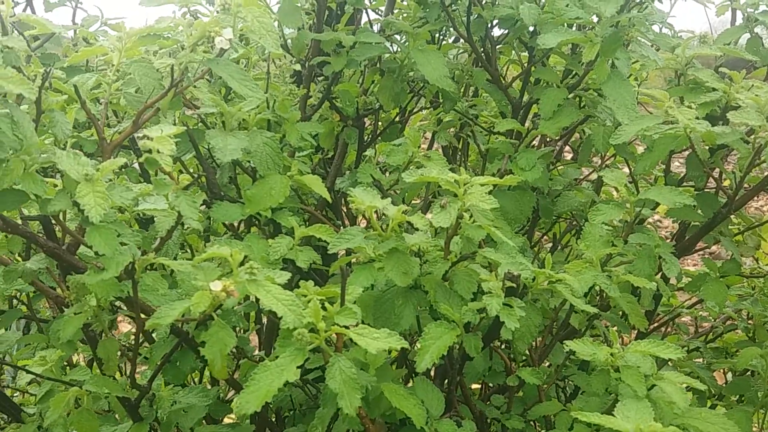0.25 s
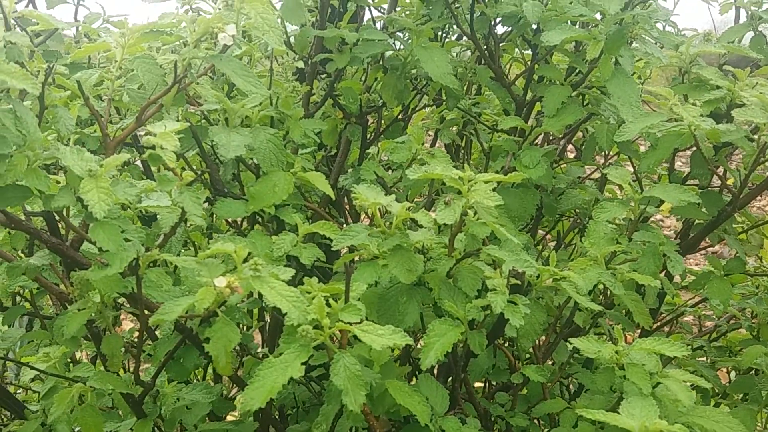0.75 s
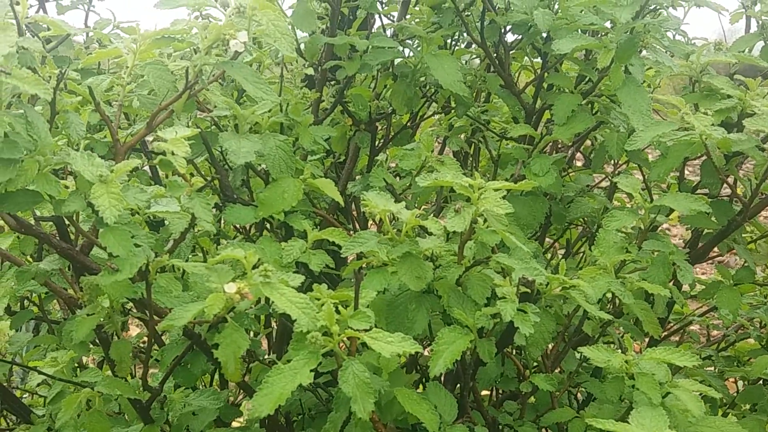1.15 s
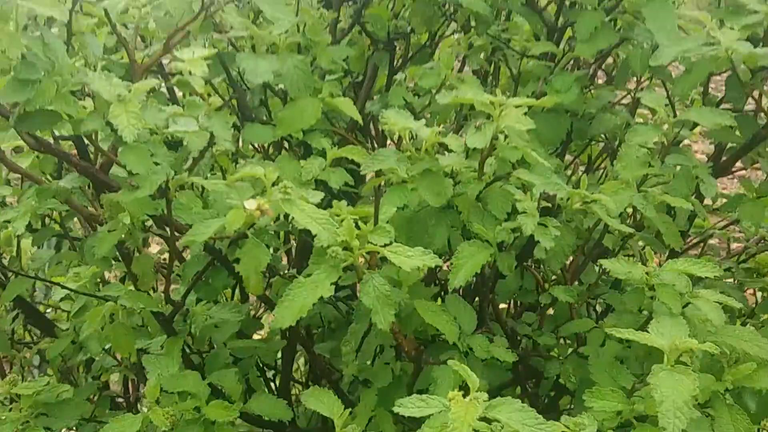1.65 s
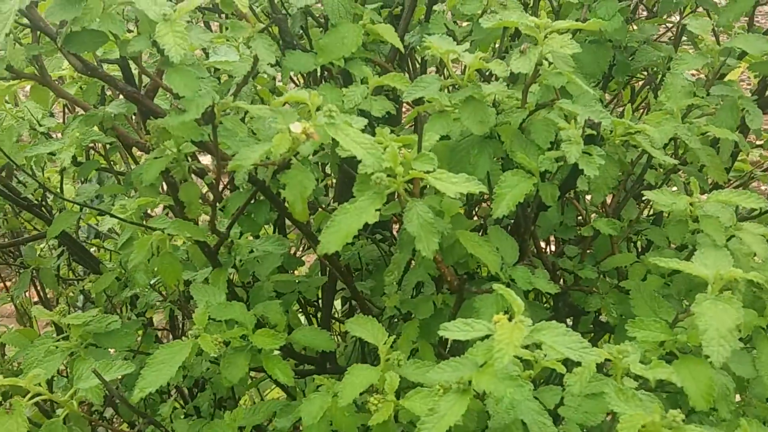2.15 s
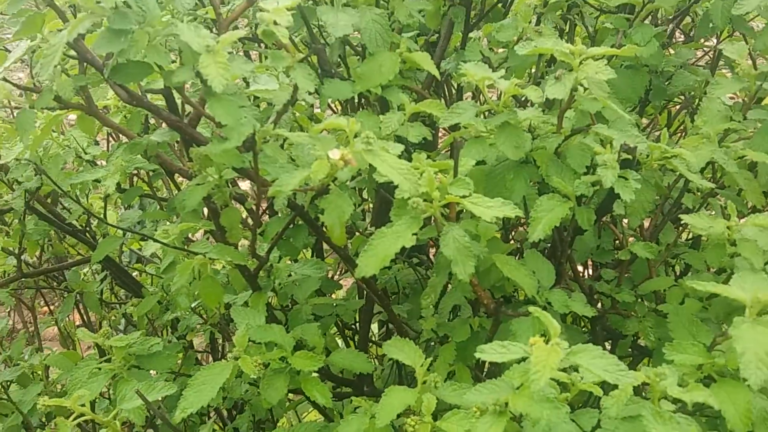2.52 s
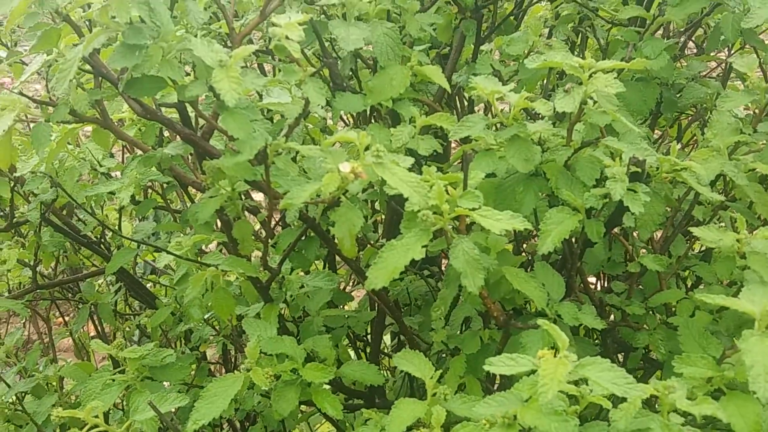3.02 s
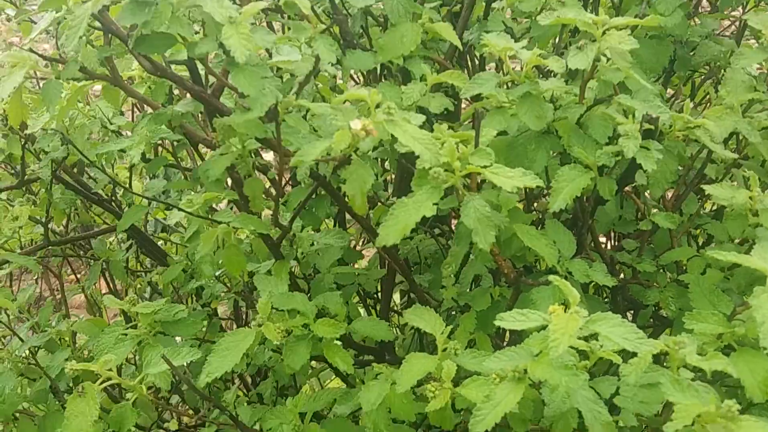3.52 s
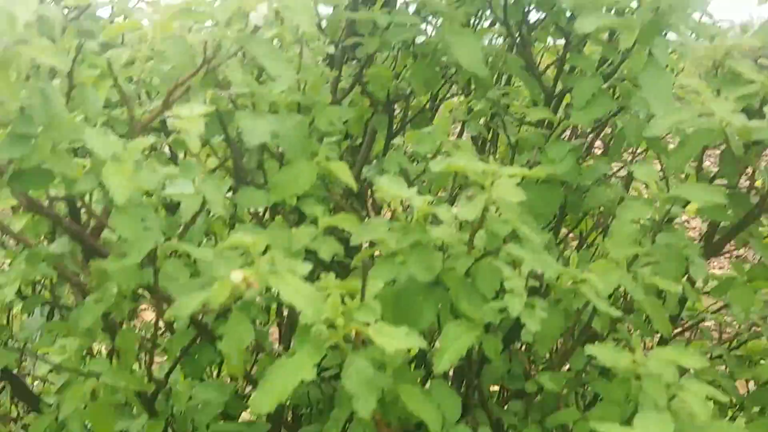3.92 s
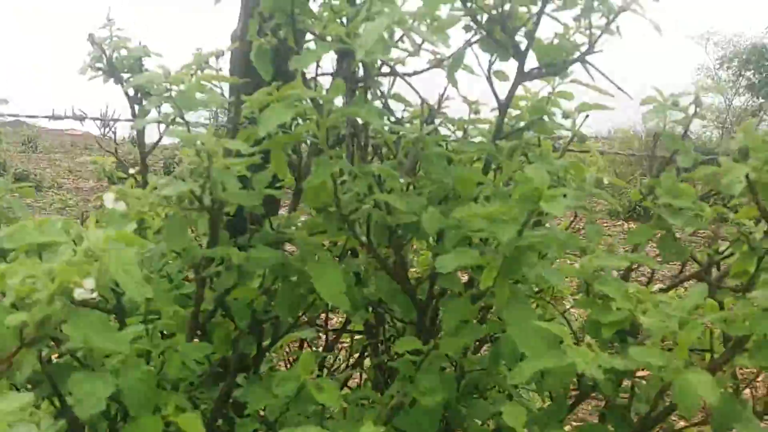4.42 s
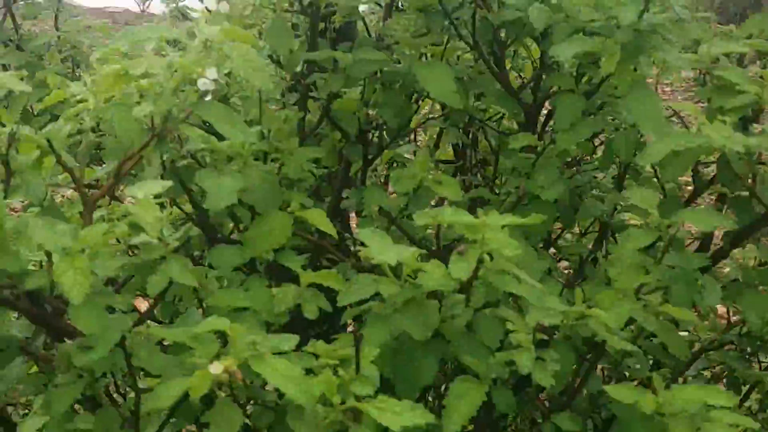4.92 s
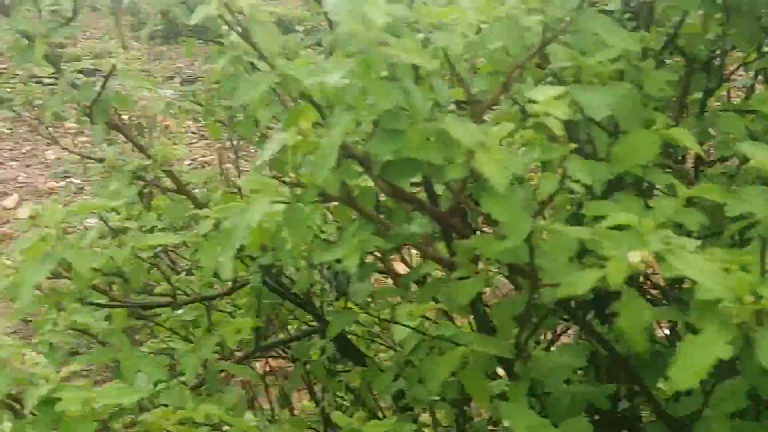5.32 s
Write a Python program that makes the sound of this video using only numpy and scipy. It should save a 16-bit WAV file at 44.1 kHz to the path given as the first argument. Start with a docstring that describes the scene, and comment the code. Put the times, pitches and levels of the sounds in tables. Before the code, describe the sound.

A dense, unbroken peeping of chicks hidden in a bush, heard close on a hand-held phone outdoors. From 0 to about 1 second, long overlapping cries dominate, each 0.1 to 0.2 seconds, opening with a fast buzzy trill and sliding down in a clear slur. They are reedy and bright, strongest in overtones around 2 to 4 kHz. From about 1.2 to 3.3 seconds the chorus is lighter, mostly short, quick peeps with occasional longer cries, farther chicks blurred behind. Faint dull finger taps are scattered throughout; at about 2.5 seconds a sharp, much louder double knock hits the phone, hollow and quickly damped. After 3.5 seconds the calls gather, and from 4.3 to 5.5 seconds trilled cries and peeps crowd together again until the abrupt end. Close reflections and a faint scrubby tail surround them, over steady low outdoor rumble, slightly fluttering, and soft hiss.

```python
"""A dense, overlapping peeping runs throughout: a brood of chicks under a bush, near a hand-held phone.
Each call is an arch in pitch, built from seven harmonics swept through throat and beak resonances.
Longer cries open with a fast trill and end in a clean slur; longer peeps crack briefly into voice.
Farther chicks call behind them, and noise-like echoes stand for the scatter of bushes and ground.
Fingers tap and knock on the phone as damped rings, over an outdoor wash of filtered noise."""
import sys
import numpy as np
from scipy import signal
from scipy.fft import rfft, irfft
from scipy.io import wavfile
from scipy.ndimage import map_coordinates

SR = 44100
rng = np.random.default_rng(int(sys.argv[2]) if len(sys.argv) > 2 else 0)


def to_wav(s):
    """Save 16-bit WAV."""
    ch = np.atleast_2d(s).T  # columns
    pcm = np.round(np.clip(ch, -1, 1) * 32767)  # PCM
    wavfile.write(sys.argv[1], SR, pcm.astype(np.int16))


N = 245195  # samples, about 5.56 s


def gain_of(db):
    """Decibels to amplitude."""
    return 10 ** (np.asarray(db) / 20)


def evened(x):
    """Scales to rms 1."""
    return x / np.sqrt(np.mean(x ** 2) + 1e-20)


def add(mix, start_s, sound):
    """Adds a sound to the mix; whatever lies outside the mix is cut off."""
    at = round(start_s * SR)
    sound = sound[max(-at, 0):]
    part = mix[max(at, 0):][:len(sound)]
    part += sound[:len(part)]


def coloured(x, points):
    """Filters by a spectrum of (frequency_hz, gain_db) points."""
    hz, db = np.transpose(points)
    f = np.fft.rfftfreq(len(x), 1 / SR)
    gain_db = np.interp(np.log(f + 1), np.log(hz), db)
    return irfft(rfft(x) * gain_of(gain_db), len(x))


def wander(t, per_s, count=128):
    """Smooth chance that takes per_s new values a second."""
    return map_coordinates(rng.standard_normal(count), [t * per_s], order=2, mode="wrap")


# the pitch crests after this share of a call's length
CRY_CREST, PEEP_CREST = .37, .345

# long near cries that open with a trill; levels and brightness are relative:
# start_s [s], length_s [s], top_pitch_hz [Hz], level_db [dB], brightness_db [dB], trill_s [s]
NEAR_CRIES = [(-0.017, 0.17, 1157, -41.5, -0.5, 0.053), (0.016, 0.15, 1044, -47, 6.5, 0.05),
              (0.059, 0.19, 1178, -43.5, -2, 0.12), (0.281, 0.19, 1149, -41.5, 0.0, 0.069),
              (0.288, 0.14, 1032, -44, 2.5, 0.06), (0.362, 0.14, 1193, -44, -1.5, 0.065),
              (0.519, 0.13, 1066, -43.5, 0, 0.058), (0.608, 0.2, 1161, -47.5, -6.5, 0.041),
              (0.642, 0.17, 1177, -43.5, -2, 0.095), (0.775, 0.13, 1065, -46, -2, 0.048),
              (0.949, 0.14, 1206, -48.5, -12, 0.06), (0.954, 0.17, 1197, -44.5, -1.0, 0.05),
              (1.234, 0.13, 1207, -48, -2, 0.052), (1.519, 0.11, 1236, -46.5, -3.5, 0.03),
              (2.215, 0.11, 1112, -48.5, -2, 0.044), (2.443, 0.13, 1150, -46.5, -5, 0.042),
              (3.367, 0.099, 1148.0, -47, -0.5, 0.028), (3.576, 0.11, 1154, -48, 0, 0.043),
              (3.808, 0.14, 1160, -48.5, -3, 0.068), (4.085, 0.133, 1150, -47.5, -0.5, 0.063),
              (4.35, 0.12, 1152, -45, -0.5, 0.052), (4.46, 0.14, 1151, -45.0, -6, 0.034),
              (4.601, 0.16, 1158, -47, -2.5, 0.084), (4.72, 0.15, 1144, -44.5, -4, 0.046),
              (4.888, 0.13, 1143, -44.5, -2, 0.1), (4.978, 0.16, 1156, -43, -4.5, 0.045),
              (5.163, 0.18, 1129, -50, -2, 0.1), (5.253, 0.16, 1155, -47.5, -6.5, 0.044),
              (5.464, 0.19, 1120, -50, -3.5, 0.12)]


def trilled_cries(trim_db=-0.13, sag_per_s=2.25):
    """Longer calls of the near chicks: a trilled opening, then a slur that sags lower the longer it lasts."""
    out = np.zeros(N)
    for start_s, length_s, pitch_hz, level_db, bright_db, trill_s in NEAR_CRIES:
        cry = chick_call(length_s, pitch_hz, level_db + trim_db, bright_db, trill_s, CRY_CREST, sag_per_s)
        add(out, start_s, cry)
    return out


# short near peeps; levels and brightness are relative:
# start_s [s], length_s [s], top_pitch_hz [Hz], level_db [dB], brightness_db [dB]
NEAR_PEEPS = [(0.476, 0.09, 1142.0, -49, 2), (0.854, 0.09, 1044.0, -53, -1), (0.88, 0.1, 1130.0, -56.5, -3),
              (1.007, 0.12, 1001.0, -50.5, -3.5), (1.198, 0.073, 1080.0, -50.5, -4.5),
              (1.34, 0.038, 872.0, -54, -1), (1.355, 0.078, 1120.0, -48, -2.5),
              (1.44, 0.06, 1124.0, -57.5, -2), (1.501, 0.077, 1133.0, -52, 6),
              (1.532, 0.096, 1035.0, -53, 0), (1.603, 0.068, 1074.0, -48, -4.5),
              (1.711, 0.049, 920.0, -55.0, -2), (1.781, 0.033, 1070.0, -57.5, -4.0),
              (1.812, 0.14, 1190.0, -52, 3.0), (1.813, 0.078, 1012.0, -49.5, -6),
              (1.916, 0.066, 1042.0, -53.5, 1.5), (2.024, 0.069, 994.0, -53.5, -10),
              (2.047, 0.08, 1076.0, -52, 0.5), (2.131, 0.093, 1139.0, -51, -2.5),
              (2.317, 0.073, 963.0, -51.5, -3), (2.332, 0.094, 1154.0, -50.5, 1.5),
              (2.535, 0.1, 1151.0, -49, -3), (2.669, 0.043, 946.0, -50.5, 0),
              (2.709, 0.078, 1115.0, -48, -8.5), (2.742, 0.083, 1170.0, -48, 0),
              (2.854, 0.045, 978.0, -48.5, -2), (2.954, 0.076, 1087.0, -50.5, -6),
              (2.956, 0.09, 1122.0, -51.5, -1), (3.048, 0.054, 950.0, -52, -5),
              (3.151, 0.093, 1164.0, -51, -2.5), (3.174, 0.056, 1082.0, -50.5, -3),
              (3.234, 0.028, 897.0, -54.0, 0), (3.309, 0.058, 1007.0, -52.5, -3),
              (3.342, 0.074, 973.0, -52, 3), (3.487, 0.086, 1046.0, -48, -2.5),
              (3.525, 0.035, 884.0, -57.5, 6), (3.67, 0.054, 1040.0, -47.5, -0.5),
              (3.751, 0.071, 1047.0, -51, 3.5), (3.752, 0.035, 901.0, -54.5, 3),
              (3.857, 0.083, 1055.0, -46.5, -2.5), (3.888, 0.052, 890.0, -55.5, -2.0),
              (3.994, 0.068, 1066.0, -48.5, 0.5), (4.029, 0.04, 910.0, -53.5, 1),
              (4.055, 0.07, 1027.0, -46.5, -6.0), (4.159, 0.054, 907.0, -53.5, -1),
              (4.224, 0.086, 1024.0, -54, -4), (4.235, 0.13, 1104.0, -46.5, -3),
              (4.296, 0.04, 912.0, -52, -11), (4.433, 0.051, 928.0, -49, -1),
              (4.502, 0.077, 1047.0, -51, 3), (4.569, 0.056, 953.0, -48, -3),
              (4.665, 0.044, 1014.0, -54.5, 5), (4.701, 0.073, 975.0, -46.5, 3.0),
              (4.847, 0.079, 985.0, -46, 3.0), (5.004, 0.068, 1000.0, -44.5, 5),
              (5.143, 0.11, 990.0, -49, 1.5), (5.173, 0.062, 996.0, -52, 7),
              (5.3, 0.081, 1008.0, -47, -1.5), (5.38, 0.059, 1045.0, -52, 1),
              (5.429, 0.055, 1037.0, -53.5, 3), (5.47, 0.069, 1009.0, -49.5, 4)]


def short_peeps(trim_db=1.0, sag_per_s=5.3, flutter_share=.15):
    """Short calls of the near chicks; the longer ones crack into voice with a flutter."""
    out = np.zeros(N)
    for start_s, length_s, pitch_hz, level_db, bright_db in NEAR_PEEPS:
        flutter_s = flutter_share * length_s
        call = chick_call(length_s, pitch_hz, level_db + trim_db, bright_db, flutter_s, PEEP_CREST, sag_per_s)
        add(out, start_s, call)
    return out


# overtones above the 4th harmonic fade when a call is pitched below full strain
STRAIN_HZ, STRAIN_DB_PER_OCTAVE = 1145, 32

# the syrinx before throat and beak, harmonics 1 to 7 in order:
# level_db [dB, relative]
SYRINX_HARMONICS = [-6, -2, 2.5, -2, -12, -18.5, -25]


def chick_call(length_s, top_hz, level_db, bright_db, trill_s, crest, sag_per_s):
    """One call: the syrinx tightens and slackens, so pitch and loudness arch together."""
    scoop, trill_depth, jitter = 0.1591, .165, 0.002  # shares of the pitch
    trill_dip_db, shimmer_db = 6.5, 1.7
    t = np.arange(int(length_s * SR)) / SR
    rise_s, fall_s = crest * length_s, (1 - crest) * length_s
    # -1 at the start, 0 at the crest, 1 at the end
    u = np.clip((t - rise_s) / np.where(t < rise_s, rise_s, fall_s), -1, 1)
    dips = trill(t, trill_s)

    slur = (np.sin(1.23 * abs(u)) / np.sin(1.23)) ** 2.3
    bend = np.where(u < 0, scoop * u ** 2, sag_per_s * fall_s * slur)
    arch = (1 - bend) * (1 - trill_depth * dips)
    pitch = top_hz * arch * (1 + jitter * wander(t, 352))
    turns = np.cumsum(pitch) / SR

    strain_db = STRAIN_DB_PER_OCTAVE * np.log2(np.clip(top_hz / STRAIN_HZ, .88, 1))
    voice = 0
    for k, source_db in enumerate(SYRINX_HARMONICS, 1):
        # brightness moves strength from the lowest two harmonics to those above
        colour_db = bright_db * (.5 if k > 2 else -.5) + strain_db * (k > 4)
        harmonic_db = source_db + colour_db + throat(k * pitch) + shimmer_db * wander(t, 114.4)
        voice = voice + gain_of(harmonic_db) * np.sin(2 * np.pi * (k * turns + rng.random()))
    # the voice starts abruptly and dies away softly
    loudness = (1 - u ** 2) ** np.where(u < 0, .38, 1.0)
    return np.sqrt(2) * gain_of(level_db - trill_dip_db * dips) * loudness * voice


def trill(t, length_s):
    """A train of quick dips, about a hundred a second; under 10 ms long, there is none."""
    beats = 104 * rng.uniform(.92, 1.08) * t + rng.random() + .08 * wander(t, 70)
    pulses = np.tanh(1.6 * np.sin(np.pi * beats) ** 4)
    dips = pulses * (1 + .15 * wander(t, 100)) - .25  # slightly above the plain voice between dips
    release = np.clip((length_s - t) / .012 + .5, 0, 1)
    return dips * release * (length_s > .01)


# resonances of throat and beak, which the harmonics sweep through:
# frequency_hz [Hz], gain_db [dB]
THROAT_AND_BEAK = [(800, -27.5), (1150, -19), (1600, 0), (2000, -1.5), (2350, 3), (2850, -0.5),
                   (3600, -6.5), (4200, 1), (4750, -1), (5250, -8), (5800, -4.5), (6400, -16),
                   (7000, -14.5), (8000, -34)]


def throat(hz):
    """Gain in dB that throat and beak give a frequency."""
    return np.interp(hz, *np.transpose(THROAT_AND_BEAK))


# how the farther chicks swell and recede, before the direct and echo balance:
# time_s [s], level_db [dB, relative]
FAR_SWELL = [(0, -57), (.7, -55), (1.1, -59), (1.5, -61), (2.0, -63), (2.5, -62), (3.1, -64), (3.7, -62),
             (4.3, -60), (4.9, -55), (5.56, -56)]


def far_chicks(count=120, bright_db=-1, sag_per_s=3.6):
    """An even scatter of calls from farther off; the higher ones are longer and trilled."""
    out = np.zeros(N)
    for k, (when, effort, nearness) in enumerate(rng.random((count, 3))):
        length_s = 0.049 + .075 * effort
        rise_s = CRY_CREST * length_s
        trill_s = rise_s * (effort > .7)
        pitch_hz = 900 + 290 * effort
        call = chick_call(length_s, pitch_hz, 6 * nearness, bright_db, trill_s, CRY_CREST, sag_per_s)
        crest_s = (k + when) / count * N / SR
        add(out, crest_s - rise_s, call)
    swell_db = np.interp(np.arange(N) / SR, *np.transpose(FAR_SWELL))
    return evened(out) * gain_of(swell_db)


# colour of what the bushes and ground scatter back:
# frequency_hz [Hz], gain_db [dB]
SCATTER_COLOUR = [(1000, 29.5), (2200, 10.5), (3000, 9.5), (4500, 9.5), (7000, 21)]


def bushes(x, late_db=-27.5, early_db=-22.0, early_t60_s=0.051, late_t60_s=.45):
    """Ground and twigs give quick reflections; the scrub around adds a faint tail."""
    t = np.arange(SR // 2) / SR
    sparse = rng.random(len(t)) < 2000 / SR  # about 2000 reflections a second
    reflections = rng.choice([-1., 1.], len(t)) * sparse * (t > .002)
    early = reflections * gain_of(-60 * t / early_t60_s)
    late = reflections * gain_of(-60 * t / late_t60_s) * (1 - np.exp(-t / .02))
    # both levels are set ahead of the colour
    echo = gain_of(early_db) * early / np.linalg.norm(early)
    echo = echo + gain_of(late_db) * late / np.linalg.norm(late)
    return signal.fftconvolve(x, coloured(echo, SCATTER_COLOUR))[:N]


# touches of the fingers on the case:
# start_s [s], level_db [dB, before onset and decay], ring_hz [Hz]
FINGER_TOUCHES = [(0.149, -41, 75.4), (0.175, -30.5, 236), (0.174, -35, 1200), (0.466, -32, 182),
                  (0.689, -36, 116), (0.914, -31, 166), (1.127, -35, 130), (1.27, -32.5, 316),
                  (1.524, -37, 140), (1.586, -31, 238), (2.4756, -15, 212), (2.4808, -10, 890),
                  (2.483, -24.5, 90), (2.494, -33, 1300), (2.792, -32, 346), (2.845, -30.5, 272),
                  (3.028, -35.5, 129), (3.759, -33.5, 254), (4.752, -35.5, 237), (4.89, -36.5, 218),
                  (5.368, -32, 258)]


def fingers(onset_cycles=0.025, scuff_db=-15, decay_cycles=3.3):
    """Each touch gives the case a short push, damped by 60 dB in a few cycles, and a dull scuff."""
    out, t = np.zeros(N), np.arange(SR // 8) / SR
    for start_s, level_db, ring_hz in FINGER_TOUCHES:
        dull = signal.butter(2, 1.4 * ring_hz, fs=SR)
        scuff = evened(signal.lfilter(*dull, rng.standard_normal(len(t))))
        touch = -np.sin(2 * np.pi * ring_hz * t) + gain_of(scuff_db) * scuff
        decay = gain_of(level_db - 60 * t * ring_hz / decay_cycles)
        onset = 1 - np.exp(-t * ring_hz / onset_cycles)
        add(out, start_s, decay * touch * onset)
    return out


# colour of the open-air background and microphone hiss:
# frequency_hz [Hz], density_db [dB per Hz, relative]
AIR_COLOUR = [(25, -42), (55, 2), (100, -0.5), (240, -2.5), (340, -4), (760, -12.5), (870, -6.5),
              (990, -12), (1100, -11), (1300, -13.5), (2800, -9.5), (4500, -32.5), (7500, -38.5),
              (15500, -39.5)]


def air(level_db=-53.5, flutter_db=1.5, rumble_hz=450):
    """A steady outdoor wash and hiss, whose low rumble flutters in the moving air."""
    t = np.arange(N) / SR
    wash = evened(coloured(rng.standard_normal(N), AIR_COLOUR))
    rumble = signal.sosfiltfilt(signal.butter(2, rumble_hz, fs=SR, output="sos"), wash)
    hiss = wash - rumble
    return gain_of(level_db) * (rumble * gain_of(flutter_db * wander(t, 22)) + hiss)


def scene(far_direct_db=-7, far_echo_db=9, case_hz=5200):
    """Everything reaches one microphone, alike in both channels."""
    from_edge = np.minimum(np.arange(N), np.arange(N)[::-1])
    ease = np.minimum(from_edge / (.004 * SR), 1)  # 4 ms fade of the chicks at both ends
    near = (trilled_cries() + short_peeps()) * ease
    far = far_chicks() * ease
    echoes = bushes(near + gain_of(far_echo_db) * far)
    chorus = near + gain_of(far_direct_db) * far + echoes
    handling = signal.lfilter(*signal.butter(2, case_hz, fs=SR), fingers())  # the case muffles the taps
    mono = chorus + handling + air()
    return np.array([mono, mono])


def record(dry, low_cut_hz=48, edge_hz=15900):
    """The phone's bass cut and treble limit."""
    cut = signal.sosfilt(signal.butter(4, low_cut_hz, "high", fs=SR, output="sos"), dry)
    band_limit = signal.firwin(511, edge_hz, window=("kaiser", 9), fs=SR)
    return signal.oaconvolve(cut, band_limit[None], "same")


dry = scene()
out = record(dry)
to_wav(out)
```